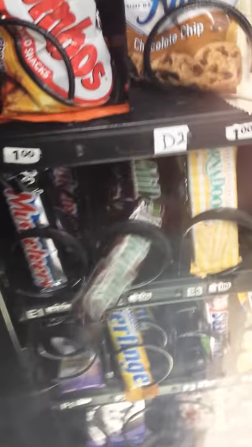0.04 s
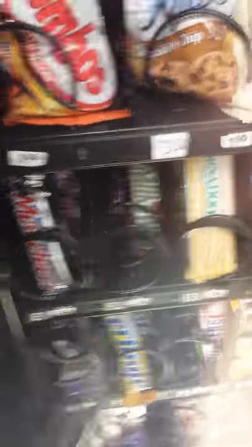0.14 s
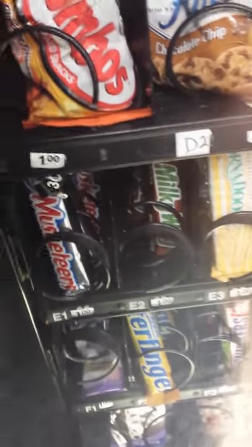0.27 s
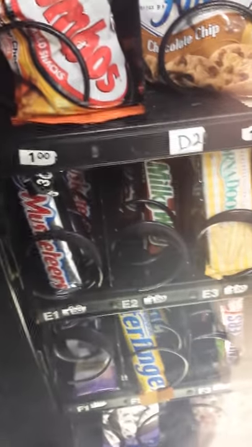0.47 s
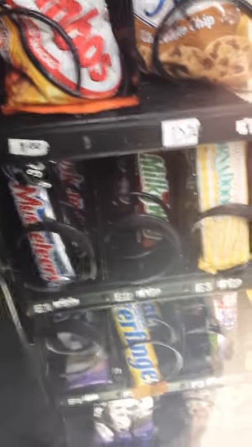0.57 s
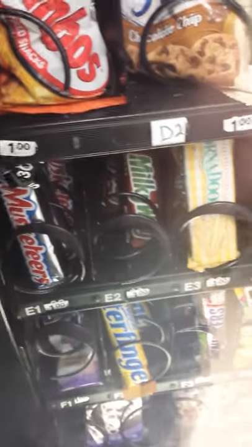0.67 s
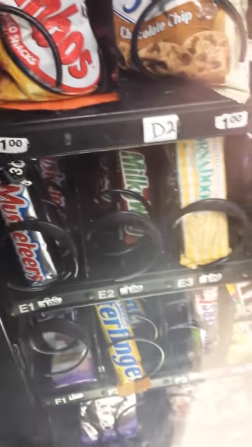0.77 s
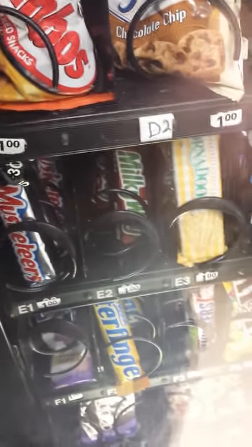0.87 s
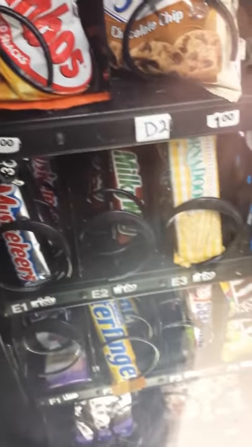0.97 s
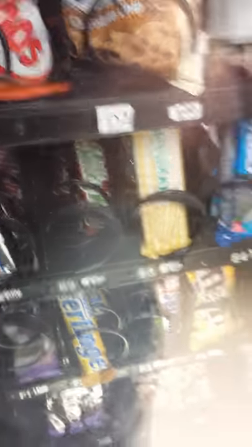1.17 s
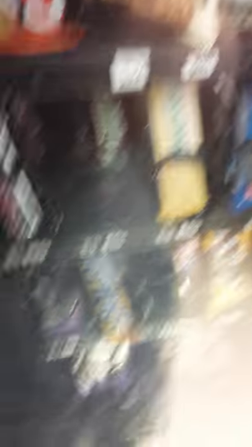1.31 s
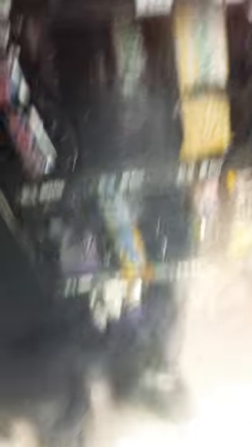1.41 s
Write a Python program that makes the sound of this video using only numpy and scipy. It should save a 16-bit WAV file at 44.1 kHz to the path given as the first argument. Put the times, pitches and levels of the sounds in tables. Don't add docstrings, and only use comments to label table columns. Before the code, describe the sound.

A snack bar scrapes off a wire coil and thuds into a humming vending machine's metal tray

```python
import sys
import numpy as np
from scipy import signal
from scipy.fft import rfft, irfft
from scipy.io import wavfile
from scipy.ndimage import uniform_filter1d

SR = 44100
rng = np.random.default_rng(int(sys.argv[2]) if len(sys.argv) > 2 else 0)


def store_pcm(level_fs):
    pcm = np.round(np.clip(level_fs, -1, 1) * 32767).astype(np.int16)
    wavfile.write(sys.argv[1], SR, np.atleast_2d(pcm).T)


def ratio_of_db(decibels):
    return 10 ** (np.asarray(decibels, float) / 20)


N = 63945
T = np.arange(N) / SR

# [f/Hz, level/dB per Hz]
HUM_COLOUR = [(25, -18), (85, -11), (230, -4), (600, -14), (1300, -25), (4100, -37), (6600, -34),
              (8600, -42), (14500, -44)]
# [f/Hz, width/Hz, level/dB]
CABINET_RINGS = [(90.87, 6.5, -39), (120, 6.6, -39), (178, 5.4, -39.5), (225.8, 12.3, -39),
                 (291.6, 2.2, -51.5), (412.2, 10, -47.5), (806, 11, -71), (2250, 53, -77),
                 (4710, 240, -58.5), (6470, 320, -54), (7390, 560, -56)]
# [f/Hz, level/dB]
COMPRESSOR_TONES = [(91, -37), (120.5, -36), (177, -53.5), (227, -45), (408, -40.5)]
# [f/Hz, likeness 0 to 1]
PORT_LIKENESS = [(60, 0.91), (180, 0.97), (540, 0.83), (1630, 0.046), (4920, 0.014), (14800, 0.03)]
# [f/Hz, level/dB]
PORT_BALANCE = [(60, 0), (400, -.5), (700, 1.5), (2400, 1), (4300, -9), (6600, -24), (9000, -21),
                (14800, -20)]
# [t/s, level/dB, rise/s, t60/s, panel ring level/dB]
SCUFFS = [(0.026, -34.5, 0.015, 0.23, -59), (0.067, -41.5, 0.0032, 0.76, -84),
          (0.144, -36.5, 0.0075, 0.29, -40), (0.193, -38, 0.031, 0.69, -39), (0.224, -47, 0.033, 0.69, -65),
          (0.2182, -41, 0.0012, 0.013, -60), (0.2434, -26, 0.0014, 0.015, -60),
          (0.2477, -29, 0.00089, 0.012, -60), (0.2504, -33.5, 0.0012, 0.018, -60),
          (0.2525, -29.5, 0.0013, 0.12, -37), (0.0735, -41, 0.00076, 0.021, -63),
          (0.1998, -42, 0.0008, 0.033, -60), (1.344, -47, .002, 0.11, -65), (0.295, -38, 0.0016, 0.76, -68),
          (0.351, -45.5, .003, 0.81, -74), (0.432, -42.5, 0.013, 0.28, -28),
          (0.493, -35.5, 0.006, 0.077, -58), (0.851, -37, 0.0027, 0.12, -35),
          (0.993, -44.5, 0.0081, 0.44, -40), (1.1124, -15.5, 0.003, 0.074, -60),
          (1.127, -36, 0.0017, .06, -60), (1.136, -33.5, 0.025, 0.44, -54),
          (1.199, -41, 0.0055, 0.055, -54), (1.262, -43.5, 0.0027, 0.11, -64),
          (1.307, -42.5, 0.0038, 0.24, -74), (1.381, -36, 0.004, 0.15, -52),
          (1.428, -43, 0.0049, 0.18, -62)]
# [f/Hz, level/dB per Hz]
SCUFF_COLOUR = [(200, -11.5), (540, 1.5), (1400, -9.5), (3200, -7.5), (4100, -13.5), (6650, -4),
                (9400, -12.5), (12000, -22), (15000, -15.5)]
# [f/Hz, width/Hz, level/dB]
PANEL_RINGS = [(2300, 170, -9.5), (3130, 730, -18.5)]
# [t/s, length/s, f/Hz, level/dB, width/Hz]
SQUEAKS = [(0.027, 0.018, 2285, -42, 60), (0.033, 0.025, 2590, -47.5, 47), (0.154, 0.031, 2240, -46, 120),
           (0.22, 0.052, 2290, -41.5, 40), (0.243, 0.025, 1200, -46, 120), (0.242, 0.019, 1850, -46, 110),
           (0.432, 0.069, 2250, -47, 150), (0.433, 0.038, 3345, -44.5, 150), (1.2, 0.078, 4800, -53, 185.2),
           (.35, 0.014, 2300, -52, 300), (0.246, .02, 1520, -47, 100)]
# [t/s, level/dB]
BLOWS = [
    (.2986, -9.1),
    (.3014, -1.9),
    (.3065, -2.5),
    (.3211, -15.2),
]
# [f/Hz, level/dB, t60/s, left minus right/dB]
TRAY_MODES = [(190, -29, .6, -4.6), (300, -27, .5, 0), (395.2, -14.1, .41, -.4), (436, -17, .5, -.9),
              (465.5, -2, .24, .9), (533.9, -18.1, .44, 3.7), (633.6, -24.8, .5, .8),
              (685.6, -2.9, .4, 6.6), (764.3, -17, .2, 3), (810, -3, .04, 3.4), (892.6, -19.9, .31, 3.3),
              (1000.3, -19, .11, -6.5), (1125, -10, .02, 0), (1890, -28, .022, 8)]
# [f/Hz, level/dB per Hz]
CLATTER_COLOUR = [(59, -56), (100, -44.5), (286, -36), (407, -11), (581, 10), (767, 3.5), (1740, -14.5),
                  (4000, -57), (5200, -75), (8800, -120)]
# [t/s, level/dB, t60/s]
SETTLES = [
    (0.382, -28.5, 0.21),
    (0.431, -37.5, 0.2),
    (.486, -35.5, .15),
    (0.51, -31.5, 0.21),
]
# [t/s, level/dB]
TICKS = [
    (.5584, -14),
    (.5664, -17),
    (.5692, -20),
    (.6012, -22),
]
# [t/s, gain/dB]
PHONE_GAIN = [(0, 2.5), (.07, 2.5), (.12, -0.5), (.2, 3.5), (.265, 2.5), (.29, -9), (.3, -0.5), (.377, -3),
              (.384, -5.5), (.43, -8), (.54, -6), (.61, -13), (.82, -12), (1.1, -11.5), (1.16, -9.5),
              (1.25, -10.5), (1.35, -5.5), (1.45, -5)]

HUM_DB, WAVER_DB = -33, 2.5
GRAIN_DB, GRAINS_PER_S = 2., 6000
PORT_RING_HZ, PORT_RING_WIDTH_HZ, PORT_RING_DB = 6660, 850, -4.5
SQUEAK_CLEAN = .55
SQUEAK_PAN_DB = 9.5
BLOW_S, TRAY_DB, PORT_LAG_S = 0.00066, 0, 0.00019
DAMPED_S, DAMPED_DB_PER_S = 0.383, 248
BODY_HZ, BODY_DB, BODY_T60_S = 213.3, -16, 0.071
CLATTER_DB, CLATTER_T60_S = -22, .4
TICK_S, TICK_HZ, TICK_EDGE_HZ = .002, 130, 10000
SELF_DB = -70.5
GATE_FROM_HZ, GATE_TOP_DB = 5500, -26
GATE_DB, GATE_SPREAD_DB, GATE_LEFT_DB, GATE_TILT_DB_PER_KHZ = -56.5, 6, -45, 4.2
CEILING, EDGE_HZ = .97, 14800


def evened(x):
    return x / np.sqrt(np.mean(x ** 2) + 1e-20)


def read(points, hz):
    f, value = np.transpose(points)
    return np.interp(np.log(hz + 1), np.log(f + 1), value)


def resonate(x, hz, width):
    r = np.exp(-np.pi * abs(width) / SR)
    pole = r * np.exp(2j * np.pi * hz / SR)
    return 2 * signal.lfilter([1 - r], [1, -pole], x).real


def fuzzy_ring(noise, hz, width):
    return evened(resonate(resonate(noise, hz, width), hz, width))


def paired(a, b, colour):
    hz = np.fft.rfftfreq(N, 1 / SR)
    same = np.clip(read(PORT_LIKENESS, hz), 0, 1)
    a, b = rfft(a), rfft(b)
    left_share = 1 / (1 + ratio_of_db(-2 * read(PORT_BALANCE, hz)))
    left = a * np.sqrt(left_share)
    right = (same * a + np.sqrt(1 - same ** 2) * b) * np.sqrt(1 - left_share)
    return irfft(np.array([left, right]) * ratio_of_db(read(colour, hz)), N)


def swell(start, rise, t60):
    t = np.maximum(T - start, 0)
    fade_db = -60 * np.maximum(t - rise, 0) / max(t60, .01)
    return np.minimum(t / max(rise, 1e-4), 1) * ratio_of_db(fade_db)


def hum():
    a, b, c, d = rng.standard_normal((N, 4)).T
    flat = paired(c, d, [(20, 0.01), (20000, 0.0034)])
    rings = sum(ratio_of_db(db) * fuzzy_ring(flat, hz, width) for hz, width, db in CABINET_RINGS)
    return ratio_of_db(HUM_DB) * evened(paired(a, b, HUM_COLOUR)) + rings


def compressor():
    noise = rng.standard_normal((N, len(COMPRESSOR_TONES)))
    wavers = uniform_filter1d(noise, size=3000, axis=0).T
    out = 0
    for (hz, db), waver in zip(COMPRESSOR_TONES, wavers):
        tone = np.sin(2 * np.pi * (hz * T + rng.random()))
        out = out + ratio_of_db(db + WAVER_DB * evened(waver)) * tone
    return out


def scuffs():
    grain_size = ratio_of_db(GRAIN_DB * np.minimum(rng.exponential(1, N), 5))
    grains = grain_size * (rng.random(N) < GRAINS_PER_S / SR)
    a, b = rng.standard_normal((N, 2)).T * (.5 + uniform_filter1d(grains, size=12))
    rub = sum(ratio_of_db(db) * swell(s, rise, t60) for s, db, rise, t60, _ in SCUFFS)
    ring = sum(ratio_of_db(db) * swell(s, rise, t60) for s, _, rise, t60, db in SCUFFS)
    c, d = rng.standard_normal((N, 2)).T
    shake = np.array([c, 0.76 * d])
    panel = sum(ratio_of_db(db) * fuzzy_ring(shake, hz, width) for hz, width, db in PANEL_RINGS)
    raw = evened(paired(a, b, SCUFF_COLOUR))
    whistle = ratio_of_db(PORT_RING_DB) * resonate(raw, PORT_RING_HZ, PORT_RING_WIDTH_HZ)
    return rub * evened(raw + whistle) + ring * panel


def squeaks():
    out, noise = np.zeros((2, N)), rng.standard_normal((N, 2)).T
    noise[1] = .6 * noise[0] + .8 * noise[1]
    for s, length, hz, db, width in SQUEAKS:
        arch = np.sqrt(np.sin(np.pi * np.clip((T - s) / length, 0, 1)).clip(0))
        fuzz = fuzzy_ring(noise, hz, width)
        tone = (1 - SQUEAK_CLEAN) * fuzz + 2 * SQUEAK_CLEAN * np.sin(2 * np.pi * hz * T)
        pan_db = SQUEAK_PAN_DB if s < BLOWS[0][0] else 0
        out += ratio_of_db(db + pan_db * np.array([[.5], [-.5]])) * arch * tone
    return out


def thud():
    tray = np.zeros((2, N))
    for s, blow_db in BLOWS:
        t = np.maximum(T - s - np.array([[0], [PORT_LAG_S]]), 0)
        onset = 1 - np.exp(-t / BLOW_S)
        for hz, db, t60, pan_db in TRAY_MODES:
            pan = ratio_of_db(pan_db * np.array([[.5], [-.5]]))
            fade = ratio_of_db(TRAY_DB + blow_db + db - 60 * t / t60)
            tray += pan * fade * np.sin(2 * np.pi * hz * t) * onset
    tray *= ratio_of_db(-DAMPED_DB_PER_S * np.maximum(T - DAMPED_S, 0))
    landing = BLOWS[0][0]
    boom = ratio_of_db(BODY_DB) * swell(landing, 0.0059, BODY_T60_S) * np.sin(2 * np.pi * BODY_HZ * (T - landing))
    loose = ratio_of_db(CLATTER_DB) * swell(landing, 0.0079, CLATTER_T60_S)
    loose = loose + sum(ratio_of_db(db) * swell(s, 0.012, t60) for s, db, t60 in SETTLES)
    a, b = rng.standard_normal((N, 2)).T
    return tray + boom * ratio_of_db([[-2.], [2.]]) + loose * evened(paired(a, b, CLATTER_COLOUR))


def ticks():
    start, db = np.array(TICKS).T[:, :, None]
    t = T - start
    step = ratio_of_db(db) * (t > 0) * np.exp(-np.abs(t) / TICK_S) * np.cos(2 * np.pi * TICK_HZ * t)
    b, a = signal.butter(1, [60, TICK_EDGE_HZ], "band", fs=SR)
    left = signal.lfilter(b, a, step.sum(0))
    return np.array([left, 0 * left])


def gated(x):
    hz, _, z = signal.stft(x, SR, nperseg=2048, noverlap=1024)
    power = abs(z[:, :1024]) ** 2
    strips_db = 10 * np.log10(power.reshape(2, 256, 4, -1).mean(2) + 1e-20)
    whole_db = np.minimum(10 * np.log10(power.sum(1).mean(0) + 1e-20), GATE_TOP_DB)
    chance_db = GATE_SPREAD_DB * rng.standard_normal(strips_db.shape[::-1]).T
    tilt_db = GATE_TILT_DB_PER_KHZ * (hz[2:1024:4, None] / 1000 - 10)
    short_db = whole_db + GATE_DB + tilt_db + chance_db - strips_db
    keep = 1 / (1 + np.exp(np.clip(short_db, -20, 20)))
    keep = np.where(hz[:1024, None] > GATE_FROM_HZ, np.repeat(keep, 4, axis=1), 1)
    z[:, :1024] *= np.maximum(keep, ratio_of_db(GATE_LEFT_DB))
    return signal.istft(z, SR, nperseg=2048, noverlap=1024)[1][:, :N]


def scene():
    air = hum() + compressor() + scuffs() + squeaks() + thud()
    gain = ratio_of_db(np.interp(T, *np.transpose(PHONE_GAIN)))
    return air * gain + ratio_of_db(SELF_DB) * rng.standard_normal((N, 2)).T


def roll_off(x):
    return signal.sosfilt(signal.butter(12, 15400, fs=SR, output="sos"), x)


def record(dry):
    held = dry / (1 + abs(dry / CEILING) ** 8) ** (1 / 8)
    edge = signal.firwin(255, EDGE_HZ, fs=SR)[None]
    mix = signal.oaconvolve(gated(held) + ticks(), edge, "same")
    return roll_off(mix)


dry = scene()
out = record(dry)
store_pcm(out)
```